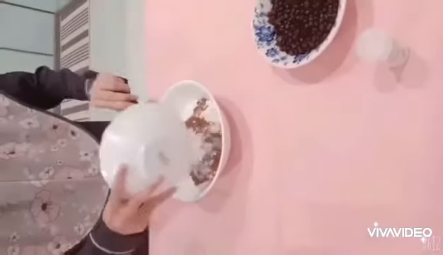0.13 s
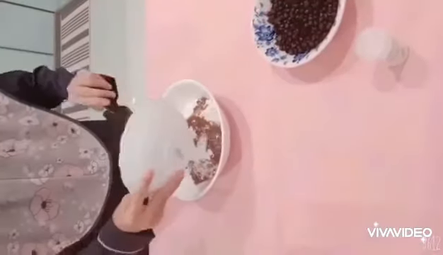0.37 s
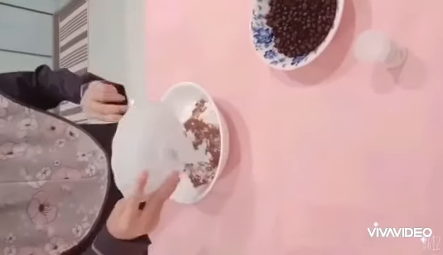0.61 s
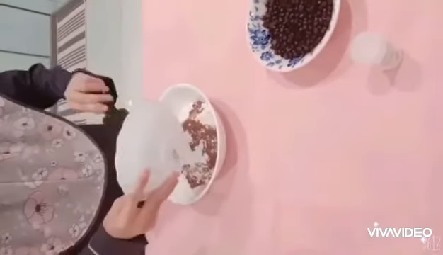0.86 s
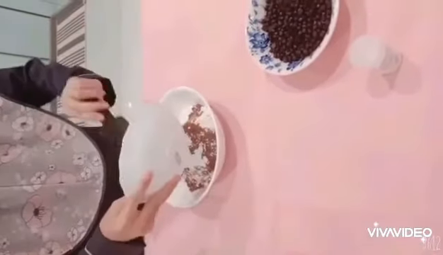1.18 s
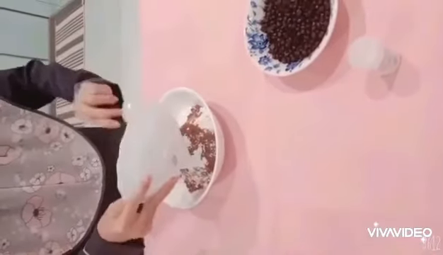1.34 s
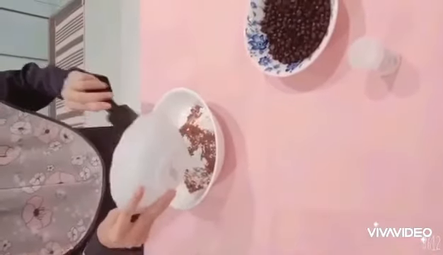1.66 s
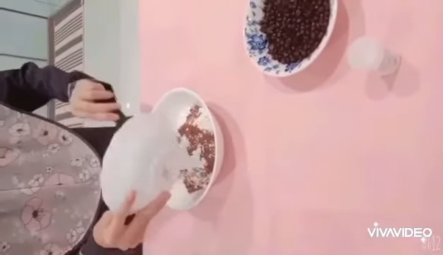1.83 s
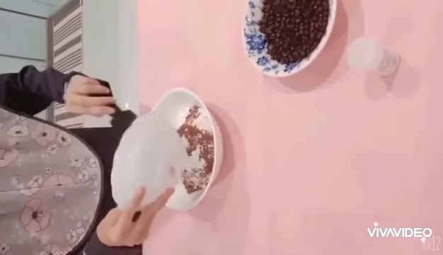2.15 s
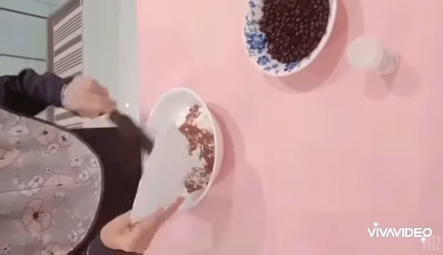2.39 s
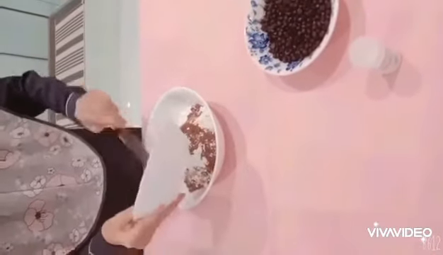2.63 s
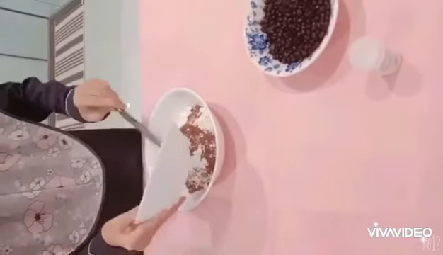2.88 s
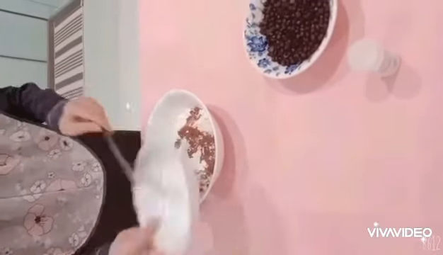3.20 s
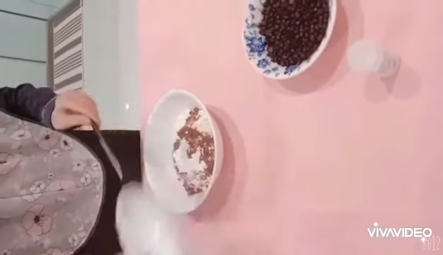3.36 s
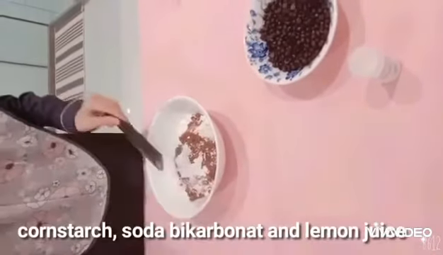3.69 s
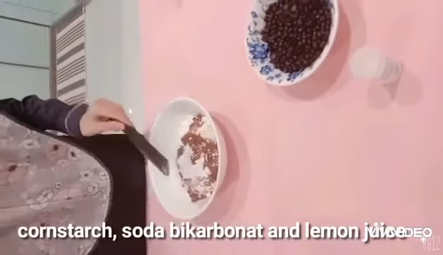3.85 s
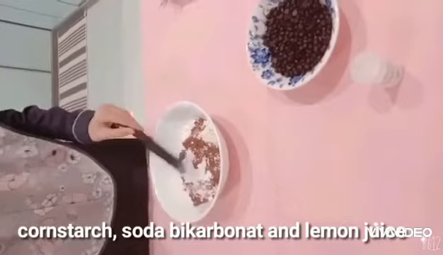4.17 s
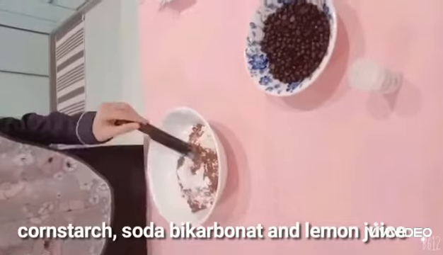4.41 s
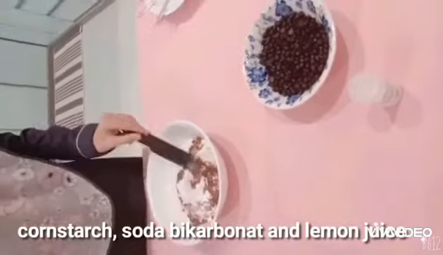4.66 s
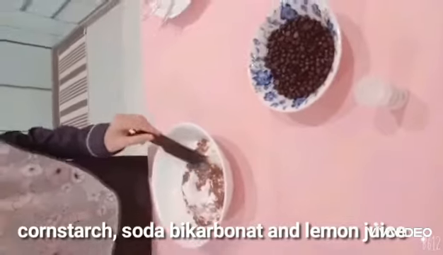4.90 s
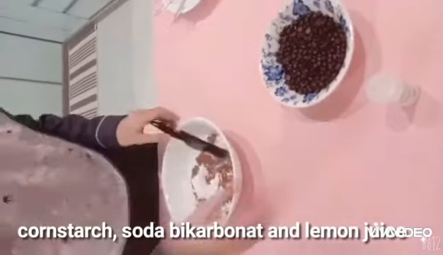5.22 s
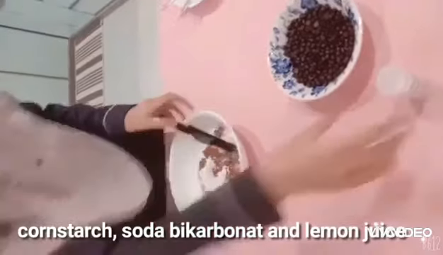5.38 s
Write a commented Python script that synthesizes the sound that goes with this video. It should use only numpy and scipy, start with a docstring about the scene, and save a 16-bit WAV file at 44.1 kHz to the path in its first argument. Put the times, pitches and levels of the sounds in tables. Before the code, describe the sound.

Quiet blade taps and gritty scratches on ceramic, two sharper clinks, then a loud china clatter with a table thump in a kitchen.

```python
"""A knife scrapes starch off a china plate into a dish on a kitchen table, over a constant, wavering hum.
The blade ticks on the powdered plate and clinks on its bare rim; then the empty plate is put
down: it clatters against other china, thumps on the table and knocks once more as it settles.
Blade, china and table ring as sums of decaying modes; knocks, cracks and thumps are coloured noise
bursts; powder and kitchen are shaped noise, with wavering tones for the hum and a gliding squeak."""
import sys
import numpy as np
from scipy import signal
from scipy.fft import rfft, irfft
from scipy.io import wavfile
from scipy.ndimage import uniform_filter1d

SR = 44100
rng = np.random.default_rng(int(sys.argv[2]) if len(sys.argv) > 2 else 0)


def transcribe(signal):
    """Save signal, clipped to [-1, 1], as a 16-bit WAV file at the path in sys.argv[1]."""
    frames = np.atleast_2d(signal).T
    limited = np.clip(frames, -1, 1)
    pcm = np.round(limited * 32767).astype(np.int16)
    wavfile.write(sys.argv[1], SR, pcm)


N = 244029
TIME = np.arange(N) / SR
AFTER = TIME[:SR]  # the second that follows a blow
# colour of the gritty powder, under the blade and under the plate: (frequency [Hz], level [dB])
GRIT_COLOUR = [(300, -7), (1200, -5), (2900, 10.5), (3900, -1.5), (5500, 10), (6600, 3), (8200, -23),
               (10000, -28.5)]


def amp(db):
    """Decibels to gain."""
    return 10 ** (np.asarray(db) / 20)


def unit(x):
    """Scales to rms 1."""
    return x / np.sqrt(np.mean(x ** 2) + 1e-20)


def read(points, hz):
    """Reads a table along a log-frequency axis."""
    f, value = np.transpose(points)
    return np.interp(np.log(hz + 1), np.log(f + 1), value)


def add(mix, s, sound):
    """Mixes a sound in at time s."""
    part = mix[max(round(s * SR), 0):][:len(sound)]
    part += sound[:len(part)]


def noise(colour):
    """Steady noise of a given spectrum, rms 1."""
    gain = amp(read(colour, np.fft.rfftfreq(N, 1 / SR)))
    return unit(irfft(rfft(rng.standard_normal(N)) * gain, N))


def drift(per_s):
    """Slow random wandering, rms 1; a higher rate wanders faster."""
    lowpass = np.exp(-(np.fft.rfftfreq(N, 1 / SR) / per_s) ** 2)
    return unit(irfft(rfft(rng.standard_normal(N)) * lowpass, N))


def slope(hz, tilt_db):
    """Tilt in dB per octave around 3500 Hz: positive brightens a sound, negative dulls it."""
    return amp(tilt_db * np.log2(np.clip(hz, 800, SR / 2) / 3500))


def struck(modes, spot_hz, favour_db):
    """The spot struck lies on the belly of some modes, which answer more strongly."""
    favoured = []
    for hz, db, t60 in modes:
        octaves_away = np.log2(hz / spot_hz)
        favoured.append((hz, db + favour_db * np.exp(-(octaves_away / 0.087) ** 2), t60))
    return favoured


def ring(modes, tilt_db=0, grip=1, rise=0.00069, blur_hz=1):
    """Decaying modes; a grip shortens them, a sliding contact starts them slowly, a loose one blurs their pitch."""
    waves = np.zeros(SR)
    for hz, db, t60 in modes:
        steps = uniform_filter1d(rng.standard_normal(SR), size=50)
        phase_wander = np.cumsum(steps) * np.sqrt(2 * np.pi * abs(blur_hz) / SR)
        decay = amp(db - 60 * AFTER / (t60 * grip)) * slope(hz, tilt_db)
        waves += decay * np.sin(2 * np.pi * hz * AFTER + phase_wander)
    return waves * (1 - np.exp(-AFTER / rise))


def contact(colour, t60, chatter, tilt_db=0, size=2048):
    """A sharp push and the dense, quickly dying chatter behind it, through a causal colour filter."""
    hz = abs(np.fft.fftfreq(size, 1 / SR))
    log_gain = np.log(amp(read(colour, hz)) * slope(hz, tilt_db))
    # minimum phase: the filter puts its energy as early as it can
    pulse = np.fft.ifft(np.exp(np.conj(signal.hilbert(log_gain)))).real
    force = chatter * rng.standard_normal(SR) * amp(-60 * AFTER / t60)
    force[0] += np.pi  # the push itself
    return signal.fftconvolve(force, pulse / np.linalg.norm(pulse))[:SR]


def room(x, wet_db):
    """Adds the kitchen's reflections: sparse taps after a short gap, each band dying at its own speed."""
    # reverberation time of the kitchen: (frequency [Hz], t60 [s])
    room_t60 = [(100, 0.39), (300, 0.68), (1200, 0.51), (3000, 0.46), (6000, 0.43), (10000, 0.23)]
    tap_here = rng.random(SR) < 2500 / SR  # 2500 taps a second on average
    taps = rng.choice([-1., 1.], SR) * tap_here * (AFTER > .006)
    taps *= 1 + 1.64 * np.exp(-AFTER / 0.0091)  # near walls answer loudest
    hz, t, bands = signal.stft(taps, SR, nperseg=256)
    band_decay = amp(-60 * t / read(room_t60, hz)[:, None])
    tail = signal.istft(bands * band_decay, SR, nperseg=256)[1]
    return x + amp(wet_db) * signal.fftconvolve(x, tail / np.linalg.norm(tail))[:N]


def bumps(rest_db):
    """Gain of the low rumble: each bump swells and dies away, long ones holding, over a faint, lumpy rest."""
    # soft low bumps while the dishes are handled: (time [s], length [s], level before trim [dB])
    handling = [(0, 0.021, -41.5), (0.17, .04, -49), (0.34, .06, -63), (0.468, .04, -51),
                (0.615, 0.059, -49), (1.031, 0.033, -46), (1.345, .12, -46.5), (1.814, 0.6, -47),
                (2.464, 0.15, -44.5), (3.163, 0.023, -41.5), (3.299, 0.11, -46), (3.93, 0.11, -47),
                (4.16, 0.11, -46), (4.39, 0.16, -42.5), (5.272, 0.19, -45)]
    trim_db = -4
    power = amp(rest_db + 5 * drift(per_s=6)) ** 2
    for s, length, db in handling:
        # starts ahead of its time and runs on past its length
        corners = [s - 0.031, s + 0.019, s + length - .01, s + length + 0.016]
        shape = np.interp(TIME, corners, [0, 1, 1, 0])
        power = power + (amp(db + trim_db) * shape) ** 2
    return np.sqrt(power)


def kitchen():
    """A lumpy low rumble, air and a hollow, burbling drone that swell with it, a wavering hum and faint hiss."""
    # colours of the low rumble, the murmur of air, the hollow drone and the hiss:
    # (frequency [Hz], relative density [dB per Hz])
    rumble_colour = [(20, -10), (50, -21.5), (90, -14.5), (122, 9), (150, -10), (182, 7.5), (230, -20.5),
                     (330, -16), (800, -57)]
    air_colour = [(20, -32), (100, 3.5), (200, 3), (370, 1.5), (500, -9), (630, 1.5), (900, -11),
                  (1200, -5), (1450, -11.5), (1750, -10), (2600, -20), (4000, -48.5)]
    drone_colour = [(900, -45.5), (1100, -12.5), (1200, -3), (1258, 5.5), (1320, -5), (1420, -37.5),
                    (1700, -65)]
    hiss_colour = [(1000, -16), (3000, 17), (4200, 7.5), (5600, 11), (6600, 16.5), (7100, 6.5), (8200, -1),
                   (9700, 0.5), (10500, -44)]
    # wavering hum tones: (frequency [Hz], rms level about which each wavers [dB])
    hum_tones = [(120, -82), (399, -70), (500, -76.5), (598, -79)]
    rest_db = -61  # the rumble between bumps
    follow = 0.19  # share of the rumble's swell, in dB, that air and drone take up

    gain = bumps(rest_db)
    rumble = noise(rumble_colour)
    # level out the noise's own swells before the bumps shape it
    envelope = np.sqrt(uniform_filter1d(rumble ** 2, size=4000) + 1e-6)
    rumble = gain * unit(rumble / envelope)

    air = noise(air_colour) * amp(-60 + 1.0 * drift(per_s=23))
    drone = noise(drone_colour) * amp(-60.5 + 3.4 * drift(per_s=6.2))  # burbles
    swelling = (air + drone) * (gain / amp(rest_db)) ** follow

    hum = np.zeros(N)
    for hz, db in hum_tones:
        level = amp(db + 3.3 * drift(per_s=18)) * np.sqrt(2)  # rms to peak
        hum += level * np.sin(2 * np.pi * hz * TIME + 0.87 * drift(per_s=9.7))
    hiss = noise(hiss_colour) * amp(-75.5 + .5 * drift(per_s=25))
    return rumble + swelling + hum + hiss


def powder():
    """Starch hisses in fine grains under the blade or the plate's foot; each stroke swells quickly and fades."""
    # gritty strokes of the blade through the powder, and of the plate's foot over the table:
    # (time [s], length [s], level [dB], brightness [dB per octave])
    strokes = [(-.03, 0.13, -58, -6), (0.167, 0.066, -66, -12.5), (0.602, 0.17, -70, 10),
               (1.16, 0.071, -67, -8), (1.587, 0.051, -55, -3), (1.9, 0.093, -57, -2.5),
               (2.012, 0.044, -56.5, 19), (2.057, 0.13, -64, 11), (2.442, 0.062, -63.5, 2),
               (3.048, 0.15, -49.5, -5.5), (3.316, 0.14, -56, -1.5), (4.904, 0.065, -42.5, 2)]
    hiss = np.zeros(N)
    for s, length, db, tilt_db in strokes:
        swell = np.interp(TIME, [s, s + 0.26 * length, s + length], [0, 1, 0])
        grains = rng.standard_normal(N) * swell
        colour = contact(GRIT_COLOUR, t60=.004, chatter=.2, tilt_db=tilt_db)[:2048]
        hiss += amp(db) * signal.oaconvolve(grains, colour / np.linalg.norm(colour))[:N]
    graininess = unit(amp(0.61 * drift(per_s=53)))
    return room(hiss * graininess, wet_db=-8.5)


def table():
    """The plate's foot drops and rocks on the table top, which booms from the first landing; nudges only hum."""
    # the plate lands on the table: (time [s], thud level [dB], brightness [dB per octave])
    thumps = [(4.906, -6, -4), (4.9207, -19, 9.5), (4.94, -14.5, 7)]
    # colour of a thud: (frequency [Hz], level [dB])
    thump_colour = [(30, -7), (70, -11), (120, 1), (300, 3.5), (600, -5), (1300, 1), (1800, -17),
                    (3000, -33.5), (6000, -36.5), (10000, -70.5)]
    # modes of the table top: (frequency [Hz], level [dB], t60 [s])
    table_modes = [(96.2, -25.5, 0.72), (123.2, -5, 0.69), (180, -26, 0.75), (202.6, -14, 0.8),
                   (248.2, -12.5, 0.44), (325, -16, 0.13), (418, -16, 0.46), (494, -13, 0.51),
                   (573, -13.5, 0.3), (716, -24.5, 0.83), (764, -15.5, 0.23), (970, -23, 0.15),
                   (1310, -2, 0.14)]
    # soft nudges of the hands and dishes: (time [s], length [s], pitch [Hz], level [dB])
    nudges = [(1.675, 0.17, 324.5, -48.5), (2.006, 0.24, 72, -51.5), (4.753, 0.26, 175.6, -34)]

    blows, boom = np.zeros((2, N))
    for s, db, tilt_db in thumps:
        add(blows, s, amp(db) * contact(thump_colour, t60=0.058, chatter=0.28, tilt_db=tilt_db))
    s, db, _ = thumps[0]
    add(boom, s, amp(db - 9.5) * ring(table_modes, rise=0.0021, blur_hz=1.2))
    for s, length, hz, db in nudges:
        swell = np.interp(AFTER, [0, 0.15 * length, length], [0, 1, 0])
        tone = np.sin(2 * np.pi * hz * AFTER + drift(per_s=35)[:SR])
        add(boom, s, amp(db) * swell * tone)
    return room(blows, wet_db=-2.5) + boom


def china():
    """Each blow cracks and sets the plate ringing, and the dish beside it if they touch."""
    # blows on bare china: (time [s], plate ring level [dB], neighbouring dish ring level [dB],
    # crack level [dB], brightness [dB per octave], share of the ring time left by the grip [ratio],
    # partial favoured by the spot struck [Hz])
    clinks = [(.70, -56.5, -70, -82, 5, 0.51, 5520), (.991, -60, -71, -49, -1, 0.61, 5520),
              (2.812, -60, -81, -51, 12, 0.35, 7400), (2.827, -73, -48, -52, 1, 0.31, 2600),
              (3.0557, -32, -65, -24, 0.5, 0.13, 2140), (3.113, -41, -68, -70, -2.5, 0.31, 3700),
              (3.135, -50, -73, -39, 0, 0.96, 5520), (3.5166, -28.5, -85, -23, 1, 0.43, 3700),
              (4.7709, -36.5, -19.5, -13.5, -2, 0.25, 5650), (4.784, -27.5, -20, -28, 1.5, 0.5, 1265),
              (4.869, -35.5, -33.5, -40, -3, 0.31, 5650), (5.0946, -52, -40, -17.5, -4.5, 0.17, 2270),
              (5.0975, -49, -28, -20, -3, 0.5, 3770), (5.325, -67, -60, -52, 0, 0.46, 2220)]
    # modes of the plate and of the dish beside it: (frequency [Hz], level [dB], ungripped t60 [s])
    plate_modes = [(943, -5.5, 0.2), (1205, -4, 0.25), (2162, -10, 0.9), (1960, -10.5, 0.15),
                   (2860, -20.5, 0.87), (3710, -9, 0.55), (5270, -1.5, 0.062), (5590, 3, 0.12),
                   (6900, -17, 0.2), (7660, -13, 0.14), (8800, -27.5, .12), (9700, -28.5, .12)]
    neighbour_modes = [(1253, -7.5, 0.41), (1566, 3, 0.043), (2213, 2.5, 0.18), (2730, -14, 0.22),
                       (3620, -16.5, 0.14), (3759, -15.5, 0.83), (5530, 0.5, 0.15), (5666, -7.5, 0.28),
                       (5500, -18, 0.029), (5840, -10, 0.33), (7970, -30, 0.37), (9400, -30, .1),
                       (10200, -27.5, 0.086)]
    # colour of the crack: (frequency [Hz], level [dB])
    crack_colour = [(100, -2.5), (600, -16), (950, 6.5), (1300, 14.5), (1700, 0), (2200, 13.5), (3200, 8.5),
                    (4400, 5.5), (5800, 3), (7200, -6.5), (8400, -38), (10000, -25)]

    rings, cracks = np.zeros((2, N))
    for s, plate_db, neighbour_db, crack_db, tilt_db, grip, spot_hz in clinks:
        # a softer crack starts the china more slowly: 18 dB less doubles the rise
        rise = 0.00043 * 2 ** (-crack_db / 18)
        # the contact that damps a ring also rattles against it and blurs its pitch
        chatter_hz = 1 + 24 * max(1 - grip, 0)
        for modes, db in (plate_modes, plate_db), (neighbour_modes, neighbour_db):
            answering = struck(modes, spot_hz, favour_db=6.5)
            add(rings, s, amp(db) * ring(answering, tilt_db, grip, rise, chatter_hz))
        crack = contact(crack_colour, t60=0.033, chatter=0.38, tilt_db=tilt_db)
        add(cracks, s, amp(crack_db) * crack)
    return room(rings, wet_db=-10.5) + room(cracks, wet_db=-7.5)


def squeak():
    """The blade squeaks faintly on the glaze: a thin note that sinks as the blade slows."""
    # one squeak: (time [s], length [s], first pitch [Hz], last pitch [Hz], level [dB])
    squeal = (3.70, .12, 3020, 2800, -61)
    s, length, first_hz, last_hz, db = squeal
    glide = np.interp(TIME, [s, s + length], [first_hz, last_hz])
    hz = glide * (1 + 0.012 * drift(per_s=160))
    swell = np.interp(TIME, [s, s + 0.22 * length, s + length], [0, 1, 0])
    return room(amp(db) * swell * np.sin(2 * np.pi * np.cumsum(hz) / SR), wet_db=-16.5)


def knife():
    """The thin blade sings when it ticks or slides; powder muffles the plate to a knock and a grainy scratch."""
    # blade ticks on the powdered plate: (time [s], blade ring level [dB],
    # dull knock level before trim [dB], gritty scratch level before trim [dB],
    # partial favoured by the spot struck [Hz])
    ticks = [(0.402, -82, -70, -51, 7000), (.990, -52, -56, -43.5, 7000), (1.21, -63, -66, -61, 9640),
             (1.461, -44.5, -33.5, -48.5, 7000), (1.586, -46, -49.5, -36.5, 7000),
             (1.942, -56, -42, -47, 7000), (2.0196, -68, -62, -40, 9640), (2.326, -47, -31, -40, 9640),
             (2.69, -60.5, -35.5, -48, 7000), (2.734, -63, -39.5, -48, 9640)]
    # the blade's edge slides on the glaze and sings: (time [s], length [s], level [dB])
    slides = [(1.07, 0.054, -66), (1.135, 0.022, -62), (1.534, 0.033, -59), (1.822, 0.01, -61),
              (1.893, 0.032, -51.5), (4.911, 0.0157, -40.5)]
    # modes of the blade: (frequency [Hz], level [dB], t60 [s])
    blade_modes = [(6970, -2, 0.076), (6983, -15, 0.05), (9500, -12, 0.066)]
    # colour of the dull knock: (frequency [Hz], level [dB])
    knock_colour = [(60, -45), (150, -4.5), (420, 0), (800, 5), (1050, 5), (1280, 11.5), (1550, -12),
                    (2350, -5.5), (3500, -43), (8000, -39)]
    knock_trim_db, scratch_trim_db = 3, -1.5
    press_peak = 0.69  # share of a slide at which it presses hardest

    song, knocks, scratches = np.zeros((3, N))
    for s, ring_db, knock_db, scratch_db, spot_hz in ticks:
        answering = struck(blade_modes, spot_hz, favour_db=7)
        add(song, s, amp(ring_db) * ring(answering, rise=0.00081))
        knock = contact(knock_colour, t60=0.015, chatter=0.66)
        add(knocks, s, amp(knock_db + knock_trim_db) * knock)
        scratch = contact(GRIT_COLOUR, t60=0.014, chatter=0.44)
        add(scratches, s, amp(scratch_db + scratch_trim_db) * scratch)

    for s, length, db in slides:
        pressure = np.interp(AFTER, [0, press_peak * length, length], [0, 1, 0])
        rub = rng.standard_normal(SR) * pressure
        sung = signal.fftconvolve(rub, ring(blade_modes, tilt_db=-26.5, rise=.004))[:SR]
        # level over the length of the slide
        add(song, s, amp(db) * sung / np.sqrt(np.sum(sung ** 2) / (length * SR)))

    grit = room(scratches, wet_db=-4) * amp(2.5 * drift(per_s=200))  # grainy flicker
    return room(song, wet_db=-9.5) + room(knocks, wet_db=-2.5) + grit


def scene():
    """All sources at one microphone above the table."""
    return (kitchen() + powder() + table() + china() + squeak() + knife())[None]


def record(dry):
    """A small microphone loses the deep bass; then a steep filter limits the treble."""
    thin = signal.sosfilt(signal.butter(2, 60, "highpass", fs=SR, output="sos"), dry)
    band_limit = signal.firwin(511, 10500, window=("kaiser", 9), fs=SR)
    return signal.oaconvolve(thin, band_limit[None], "same")


dry = scene()
out = record(dry)
transcribe(out)
```